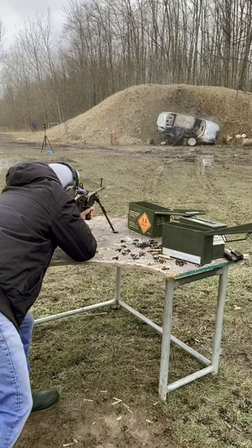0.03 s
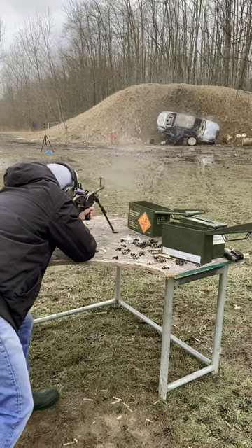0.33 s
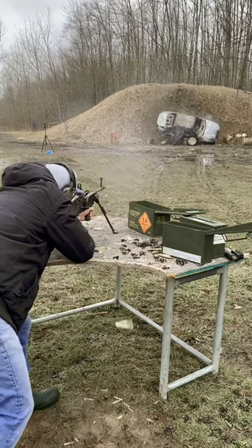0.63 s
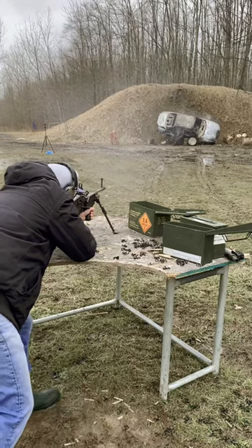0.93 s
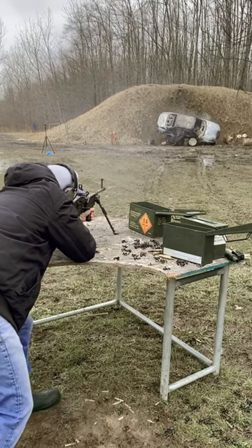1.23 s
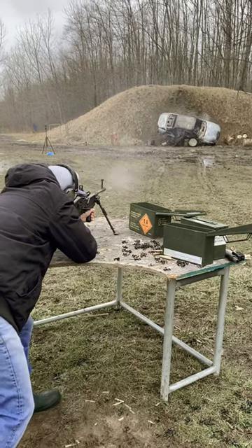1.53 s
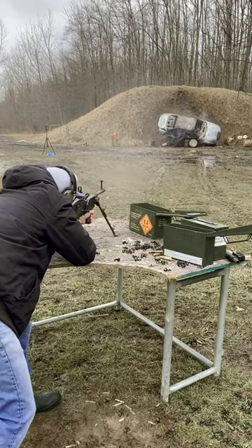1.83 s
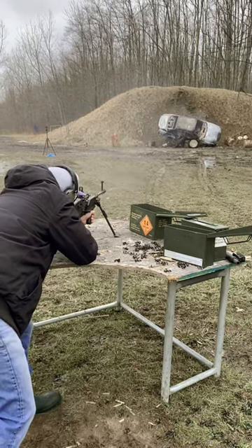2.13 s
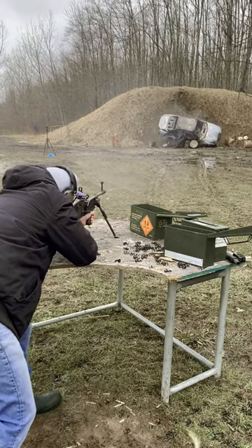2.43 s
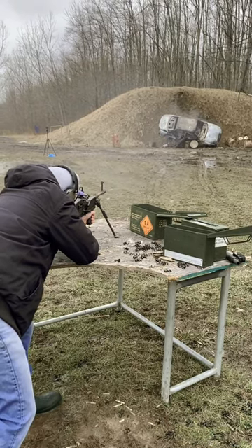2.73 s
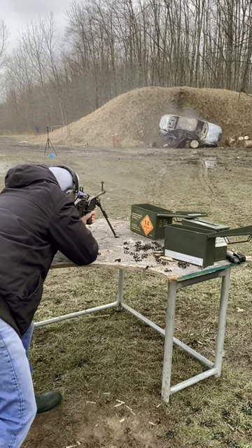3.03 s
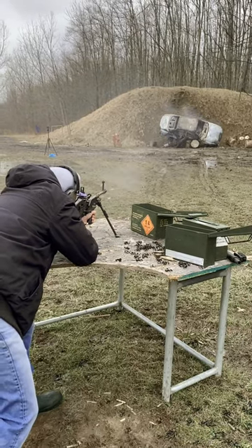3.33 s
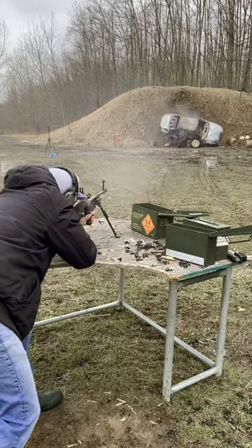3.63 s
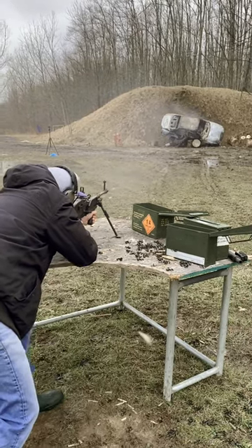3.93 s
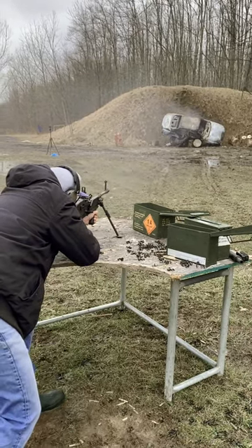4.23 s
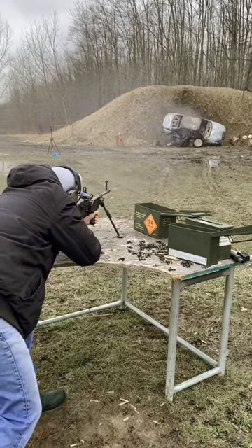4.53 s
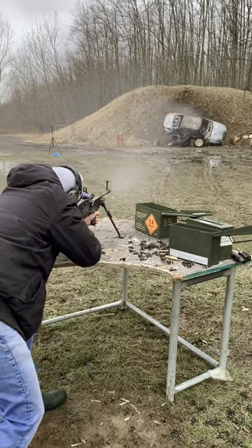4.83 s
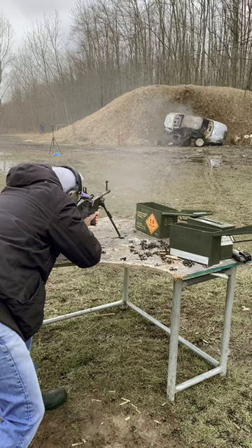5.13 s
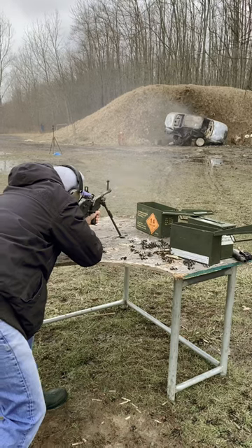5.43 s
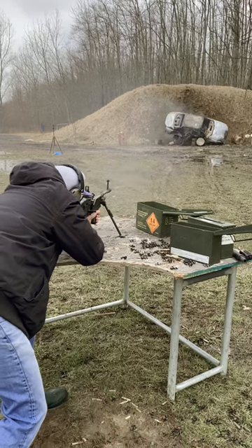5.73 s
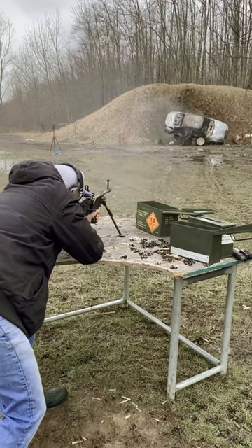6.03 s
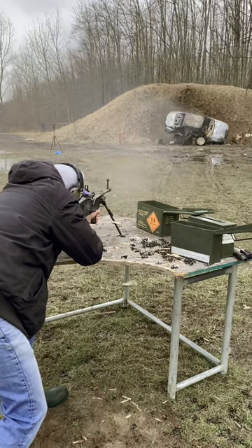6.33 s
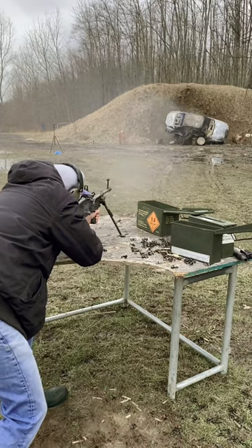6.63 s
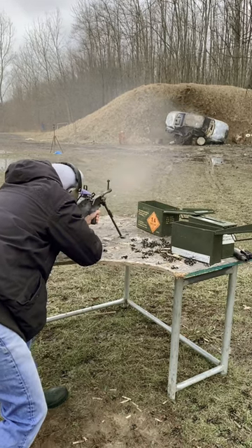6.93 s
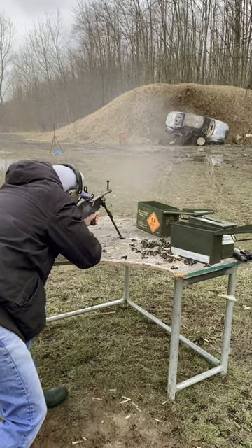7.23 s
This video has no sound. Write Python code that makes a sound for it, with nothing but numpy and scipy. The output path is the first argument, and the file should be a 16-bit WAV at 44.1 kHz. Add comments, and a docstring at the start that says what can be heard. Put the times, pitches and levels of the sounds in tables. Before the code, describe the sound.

Loud, close machine gun fire in six rapid bursts at an outdoor range, each followed by a long rolling echo.

```python
"""Machine gun on an outdoor range

A belt-fed gun fires six bursts from a table, a step from the microphone. Each muzzle blast is an
impulse that excites the modes of gun and table, with a thump of expanding gas behind it. Bolt, belt
links and spent brass ring on impact. Reflection from the berm and the forest edge draws the shots out
into a long, lumpy roll. A faint rumble opens the scene, and one deep boom underlies the first burst."""
import sys
import numpy as np
from scipy import signal
from scipy.fft import rfft, irfft, next_fast_len
from scipy.io import wavfile
from scipy.ndimage import uniform_filter1d

SR = 44100
rng = np.random.default_rng(int(sys.argv[2]) if len(sys.argv) > 2 else 0)


def output_pcm(signal):
    """Save a mono or channel-first signal as 16-bit PCM at the path in sys.argv[1].

    Samples are clipped to [-1, 1] before scaling.
    """
    pcm = np.clip(np.atleast_2d(signal).T, -1, 1) * 32767
    wavfile.write(sys.argv[1], SR, np.round(pcm).astype(np.int16))


N = 321930

# bursts of fire (first round t/s, last round t/s, number of rounds, lag of the last cycle t/s,
# ring level/dB, thump level/dB, echo level/dB, bolt catch level/dB)
BURSTS = [(0.2098, 0.5568, 4, .006, 2.5, 2, 8.5, -17), (1.5473, 1.7712, 3, 0.0035, -1, 0.5, 1, -28),
          (2.186, 2.299, 2, 0, -1.5, 0, -0.5, -24), (3.2819, 3.7287, 5, 0.0016, -2, -.5, 0, -14.5),
          (4.631, 5.196, 6, .0105, -1, 0, -1.5, -23.5), (6.1724, 7.2796, 11, 0, -2, -2.5, -2.5, -23)]
# spectral density of the low rumble (f/Hz, level/dB)
RUMBLE_SPECTRUM = [(20, -13), (40, -9), (60, 5), (90, 1), (140, -15.5), (300, -37.5), (1000, -48.5),
                   (5000, -41.5), (16000, -63.5)]
# spectral density of the open air (f/Hz, level/dB)
AIR_SPECTRUM = [(25, -28), (70, -10), (180, -2), (1500, -21.5), (5000, -36.5), (16000, -59.5)]
# modes of bolt and belt (f/Hz)
STEEL_HZ = [2660, 3770, 4520, 5400, 12400, 13500, 14600]
# spectral density of the swell before a blast (f/Hz, level/dB)
SWELL_SPECTRUM = [(100, -23.5), (300, -8), (550, 0), (950, -6), (1500, -11), (3000, -12.5),
                  (7000, -20.5), (16000, -44)]
# spectral density of the blast, also used for the bolt (f/Hz, level/dB)
BLAST_SPECTRUM = [(100, -8.5), (300, -1.5), (600, -3), (1100, -1), (1550, -6.5), (2500, -4), (3300, -7),
                  (5000, -8), (6500, -12.5), (10000, -12.5), (12500, -19), (16000, -19.5)]
# modes of gun, table and ammunition cans (f/Hz, level/dB, T60/s, left phase lead/rad)
BODY_MODES = [(162.4, -7.5, 0.064, 1.75), (233, -6.5, 0.059, 0.9), (329.7, 4.5, 0.045, 1.12),
              (497, -2, 0.059, 1.24), (640.5, 3, 0.041, 1.87), (777, -7.5, 0.084, 3.5),
              (914.5, -11, 0.13, 2), (992, -6, .055, 1.34), (1071, -6.5, 0.039, 1),
              (1287, -9.5, 0.085, 1.5), (1950, -15, 0.1, 0.75), (2295, -19.5, 0.049, 5),
              (2633, -6.5, 0.035, 1), (3060, -16, 0.041, 0.5), (3720, -12.5, 0.08, 1.8),
              (4500, -18.5, 0.11, 0.5)]
# spectral density of the reverberation from field and trees (f/Hz, level/dB)
ROLL_SPECTRUM = [(30, -16.5), (60, -5), (110, -6), (170, 1.5), (340, -5), (500, -5), (1000, -6.5),
                 (2500, -5.5), (5000, -9), (8000, -11), (12000, -37), (16000, -18.5)]
# reverberation time of field and trees (f/Hz, T60/s)
ROLL_T60 = [(50, 1), (100, 2.8), (180, 2.92), (500, 2.17), (1500, 2.02), (3000, 1.433), (6000, 0.77),
            (14000, 1.1)]
# ground, berm and forest edge (distance/m, depth/m, level/dB)
REFLECTORS = [(11.97, 7, -7.5), (28.79, 11, -2), (46.5, 10, -10.5)]
# landings of spent cases and links (t/s, level/dB)
BRASS_LANDINGS = [(2.676, -50.5), (4.247, -58.5), (5.49, -48), (5.667, -50), (5.803, -61), (5.84, -49),
                  (5.884, -61)]
# modes of a spent case (f/Hz, level/dB, T60/s)
BRASS_MODES = [(3300, -3.5, .015), (4680, -6, .02), (7300, -5, .02), (10360, 4, .025), (14280, -2, .09)]
# phase between the two microphone ports: near sounds, roll and rumble, boom (f/Hz, left lead/rad)
NEAR_PHASE = [(100, 4.5), (240, 0.45), (330, 1.5), (650, 1.92), (1500, 1.87), (6000, 1.8), (8000, 3.37),
              (11500, 4.75), (16000, 3.9)]
FAR_PHASE = [(100, 1.5), (400, 0.23), (1500, 0.16), (3200, 1.4), (6000, 2.14), (8000, 1.5), (11500, 14.5),
             (16000, 4)]
BOOM_PHASE = [(100, .2), (1000, 1)]
# coherence between the ports (f/Hz, coherence from 0 to 1)
COHERENCE = [(100, 0.99), (300, 0.88), (700, 0.96), (2500, 0.64), (6000, 0.13), (8000, 1), (11500, 1),
             (15000, 0.21)]
# response of the stereo widener to the mid signal (f/Hz, level/dB)
MID_RESPONSE = [(7000, 0.5), (8500, -7.5), (10000, -33), (11500, -14), (12500, -0.5)]

SOUND_M_PER_S = 343
BELT_START_S = .002   # the first cycle is slower: it has to set the belt moving
# a burst opens with a heavier, duller round, and the echo of its closing round stands out
FIRST_BLAST_DB, FIRST_RING_DB, FIRST_THUMP_DB = -1.0, 5.5, 5
FIRST_ECHO_DB, LAST_ECHO_DB = -2.5, 4


def from_db(db):
    """Amplitude ratio of a level in decibels."""
    return 10 ** (np.asarray(db) / 20)


def at_hz(points, hz):
    """Interpolation of a table on a logarithmic frequency axis."""
    f, value = np.transpose(points)
    return np.interp(np.log(np.maximum(hz, 1)), np.log(f), value)


def seconds(size):
    """Uniformly sampled time axis."""
    return np.arange(size) / SR


def fade(t, t60):
    """Exponential decay from t = 0, falling 60 dB in t60 seconds."""
    return (t >= 0) * np.exp(-np.log(1000) * np.maximum(t, 0) / t60)


def coloured(x, spectrum):
    """Spectral shaping of white noise at constant power."""
    gain = from_db(at_hz(spectrum, np.fft.rfftfreq(x.shape[-1], 1 / SR)))
    return irfft(rfft(x) * gain / np.sqrt(np.mean(gain ** 2)), x.shape[-1])


def ports(pair, phase):
    """Partial coherence: a common and a diffuse noise mix into left and right, shifted in phase."""
    hz = np.fft.rfftfreq(pair.shape[-1], 1 / SR)
    coherence = np.clip(at_hz(COHERENCE, hz), 0, 1)
    common = rfft(pair[0]) * np.sqrt((1 + coherence) / 2)
    diffuse = rfft(pair[1]) * np.sqrt((1 - coherence) / 2)
    turn = np.exp(.5j * at_hz(phase, hz))
    return irfft(np.array([(common + diffuse) * turn, (common - diffuse) / turn]), pair.shape[-1])


def add(out, s, sound):
    """Superposition of a sound on a track, starting at s seconds."""
    start = max(round(s * SR), 0)
    part = sound[..., :max(N - start, 0)]
    out[..., start:start + part.shape[-1]] += part


def place(times, sounds):
    """Superposition of stereo sounds, each at its own time."""
    out = np.zeros((2, N))
    for s, sound in zip(times, sounds):
        add(out, s, sound)
    return out


def rounds():
    """Nearly periodic firing: one row a round (t/s, then blast, ring, thump and echo level/dB)."""
    rows = []
    for start, end, shots, lag, ring_db, thump_db, echo_db, _ in BURSTS:
        k = np.arange(round(shots))
        first, last = k == 0, k == k[-1]
        steady = np.linspace(start + BELT_START_S, end - lag, len(k))
        rows.append(np.c_[steady - first * BELT_START_S + last * lag,
                          first * FIRST_BLAST_DB,
                          ring_db + first * FIRST_RING_DB,
                          thump_db + first * FIRST_THUMP_DB,
                          echo_db + first * FIRST_ECHO_DB + last * LAST_ECHO_DB])
    return np.vstack(rows)


def rumble(level_db=-60.0, start_s=.034, rise_s=0.0088, t60=4.0, air_db=-81.0):
    """Ambient noise: a faint low rumble decays exponentially over quiet, steady open air."""
    t = np.maximum(seconds(N) - start_s, 0)
    low, air = rng.standard_normal((2, 2, next_fast_len(N, True)))
    air = from_db(air_db) * coloured(air, AIR_SPECTRUM)[:, :N]
    low = from_db(level_db) * ports(coloured(low, RUMBLE_SPECTRUM), FAR_PHASE)[:, :N]
    return (1 - np.exp(-t / rise_s)) * (low * fade(t, t60) + air)


def bolt(release_s=0.06, release_db=-46.5, feed_s=0.024, feed_db=-36, catch_s=.115,
         rise_s=0.0034, slide_t60=0.18, catch_t60=0.059, low_hz=900.0, ring_db=-0.5, ring_q=28.0):
    """Impacts excite steel resonances: the bolt is freed, feeds a round and is caught after the burst."""
    t = seconds(4096)
    starts, ends, *_, catch_db = np.transpose(BURSTS)
    times = np.r_[starts - release_s, starts - feed_s, ends + catch_s]
    level_db = np.r_[np.repeat([release_db, feed_db], len(starts)), catch_db][:, None]
    t60 = np.repeat([slide_t60, slide_t60, catch_t60], len(starts))[:, None]
    envelope = from_db(level_db) * (1 - np.exp(-t / rise_s)) * fade(t, t60)
    noise = ports(coloured(rng.standard_normal((2, len(times), len(t))), BLAST_SPECTRUM), NEAR_PHASE)
    clacks = place(times, (noise * envelope).swapaxes(0, 1)) + 1e-18
    ring = sum(signal.lfilter(*signal.iirpeak(hz, ring_q, fs=SR), clacks) for hz in STEEL_HZ)
    highpass = signal.butter(2, low_hz, "high", fs=SR, output="sos")
    return signal.sosfilt(highpass, (clacks + from_db(ring_db) * ring) / 2)


def hollow_swell(level_db=-26.0, swell_s=0.036):
    """Exponential growth: a short swell of hollow noise runs up to each blast."""
    t = seconds(2048)
    times, _, ring_db, _, _ = rounds().T
    noise = ports(coloured(rng.standard_normal((2, len(times), len(t))), SWELL_SPECTRUM), NEAR_PHASE)
    swells = noise * fade(t[::-1], swell_s) * from_db(level_db + ring_db)[:, None]
    return place(times - t[-1], swells.swapaxes(0, 1))


def muzzle_blast(level_db=-11.0, repeat_share=.45, rise_s=0.00048, hold_s=0.004, t60=0.079,
                 scatter_db=-11.5, scatter_t60=0.22):
    """Scattering by nearby things breaks the blast into noise: part repeats, part is fresh turbulence."""
    t = seconds(8192)
    times, blast_db = rounds().T[:2]
    repeated = np.sqrt(repeat_share) * rng.standard_normal((2, 1, len(t)))
    turbulence = np.sqrt(1 - repeat_share) * rng.standard_normal((len(times), 2, len(t)))
    noise = ports(coloured(repeated + turbulence.swapaxes(0, 1), BLAST_SPECTRUM), NEAR_PHASE)
    held_s = hold_s * from_db(2 * blast_db)[:, None]   # a stronger blast lasts longer
    direct = fade(np.maximum(t - held_s, 0), t60)
    scattered = from_db(scatter_db) * fade(t, scatter_t60)
    envelope = (1 - np.exp(-t / rise_s)) * np.hypot(direct, scattered)
    blasts = noise * envelope * from_db(blast_db + level_db)[:, None]
    return place(times - .0005, blasts.swapaxes(0, 1))


def body_ring(level_db=-13.5, vary_db=1.0, detune=.011, build_cycles=1.0, crossover_hz=878.0,
              hold_s=0.004, scatter_rad=0.46, delay_s=0.001165):
    """Modal vibration: each round excites gun, table and cans a little differently."""
    t, out = seconds(6000), np.zeros((2, N))
    hz, mode_db, t60, lead = np.transpose(BODY_MODES)[:, :, None]
    start_phase = np.pi * np.arange(len(hz))[:, None] ** 2 / 4   # the modes start out of step
    build = 1 - np.exp(-(t * hz / build_cycles) ** 2)   # low modes take longer to build
    low = 1 / (1 + (hz / crossover_hz) ** 2)   # the push of gas drives low modes, the crack the steel
    for s, blast_db, ring_db, _, _ in rounds():
        strength, pitch, left, right = rng.standard_normal((4, len(hz), 1))
        gain = from_db(level_db + low * ring_db + (2 - low) * blast_db + mode_db + vary_db * strength)
        envelope = gain * build * fade(np.maximum(t - hold_s * from_db(ring_db), 0), t60)
        phase = start_phase + np.array([scatter_rad * left + lead / 2, scatter_rad * right - lead / 2])
        modes = envelope * np.sin(2 * np.pi * hz * (1 + detune * pitch) * t + phase)
        late_s = delay_s * from_db(4 * blast_db)   # after a long blast the ring comes later
        add(out, s + late_s, modes.sum(axis=1))
    return out


def gas_thump(level_db=-18.5, start_hz=120.0, end_hz=68.0, fall_s=0.011, detune=.17, t60=0.065,
              delay_s=0.007, bounce_s=.048, bounce_db=-10.0):
    """Damped pulsation: the gas ball swells and collapses, falling in pitch; the field echoes it once."""
    t, out = seconds(9000), np.zeros((2, N))
    cycles = end_hz * t + (start_hz - end_hz) * fall_s * (1 - np.exp(-t / fall_s))
    for s, _, _, thump_db, _ in rounds():
        pitch = 1 + detune * rng.standard_normal()
        wave = from_db(level_db + thump_db) * np.sin(2 * np.pi * cycles * pitch) * fade(t, t60)
        add(out, s + delay_s, wave)
        add(out, s + bounce_s, from_db(bounce_db) * wave)
    return out


def roll(level_db=-33.5, rise_s=0.034, grain_db=2.0, echo_weight=0.36,
         forest_s=0.21, forest_width_s=0.076, forest_db=1.0, forest_hz=297.4):
    """Reverberation: countless echoes off ground and trunks, with a dull swell from the forest edge."""
    t = seconds(98304)
    hz = np.fft.rfftfreq(len(t), 1 / SR)
    centres = np.geomspace(40, 16000, 14)
    impulses = np.zeros((2, N))
    for s, _, _, _, echo_db in rounds():
        # moving air changes the echo paths: each round excites its own blend of two responses
        angle = rng.uniform(0, np.pi)
        blend = np.array([np.cos(angle), np.sin(angle)])
        impulses[:, round(s * SR)] = from_db(level_db + echo_weight * echo_db) * blend
    knots = t[::256]
    grain = from_db(grain_db * np.interp(t, knots, rng.standard_normal(len(knots))))
    spectra = rfft(ports(coloured(rng.standard_normal((2, 2, len(t))), ROLL_SPECTRUM), FAR_PHASE))
    swell = from_db(forest_db) * np.exp(-((t - forest_s) / forest_width_s) ** 2)
    response = 0
    for centre, weights in zip(centres, np.eye(len(centres))):
        band = irfft(spectra * at_hz(np.c_[centres, weights], hz))
        forest = swell / (1 + np.log2(centre / forest_hz) ** 2)
        response += band * (1 - np.exp(-t / rise_s) + forest) * fade(t, at_hz(ROLL_T60, centre))
    return signal.fftconvolve(impulses[None], response * grain, axes=-1).sum(axis=1)[:, :N]


def belt_links(level_db=-40.5, t60=.045, settle_db_per_s=53.0, scatter_s=.12, vary_db=4.0,
               detune=0.023, count=7):
    """Free vibration: each round jerks the belt and loose links ring, softer the later they land."""
    t, out = seconds(4096), np.zeros((2, N))
    hz = np.array(STEEL_HZ)[:, None]
    for s in rounds()[:, 0]:
        for late_s in .02 + rng.exponential(scatter_s, count):
            strength, pitch, left, right = rng.standard_normal((4, len(hz), 1))
            gain = from_db(level_db - settle_db_per_s * late_s + vary_db * strength) * np.sqrt(hz[0] / hz)
            modes = np.sin(2 * np.pi * hz * (1 + detune * pitch) * t + np.array([left, right]))
            add(out, s + late_s, (gain * fade(t, t60) * modes).sum(axis=1))
    return out


def dull_echoes(level_db=-27.5, hz=292.0, detune=0.36, rise_cycles=0.52, lead_rad=0.24, count=6):
    """Reflection: large, distant surfaces return the blast as dull thuds, spread over their depth."""
    t, out = seconds(2048), np.zeros((2, N))
    phase = np.array([[lead_rad], [0]])
    for s, _, _, _, echo_db in rounds():
        for distance, depth, surface_db in REFLECTORS:
            gain = from_db(level_db + echo_db + surface_db)
            metres = distance + depth * ((np.arange(count) + rng.random(count)) / count - .5)
            for delay_s, pitch in zip(2 * metres / SOUND_M_PER_S, rng.standard_normal(count)):
                cycles = t * hz * np.exp(detune * pitch)
                envelope = cycles / rise_cycles * np.exp(1 - cycles / rise_cycles)
                add(out, s + delay_s, gain * envelope * np.sin(2 * np.pi * cycles + phase))
    return out


def sharp_echoes(level_db=-30.0, distance_m=30.0, depth_m=9.0, low_hz=700.0, high_hz=2600.0, count=10):
    """Backscatter: hard objects around the berm return each blast as a spray of small clicks."""
    clicks = np.zeros((2, N))
    for s in rounds()[:, 0]:
        for metres in distance_m + depth_m * (rng.random(count) - .5):
            add(clicks, s + 2 * metres / SOUND_M_PER_S, rng.standard_normal((2, 1)))
    bandpass = signal.butter(2, [low_hz, high_hz], "band", fs=SR, output="sos")
    band_share = 2 * (high_hz - low_hz) / SR
    return from_db(level_db) / band_share * signal.sosfilt(bandpass, clicks + 1e-18)


def boom(start_s=.378, level_db=-13.5, hz=56.0, rise_s=.007, t60=.2, tail_db=-11.0, tail_t60=1.1):
    """Damped oscillation: one deep boom swells under the first burst and rumbles away as noise."""
    t = seconds(65536)
    tail = ports(coloured(rng.standard_normal((2, len(t))), RUMBLE_SPECTRUM), BOOM_PHASE)
    wave = np.sin(2 * np.pi * hz * t) * fade(t, t60) + from_db(tail_db) * tail * fade(t, tail_t60)
    return place([start_s], [from_db(level_db) * (1 - np.exp(-t / rise_s)) * wave])


def spent_brass(detune=0.02, tick_db=-1.5, tick_t60=.012):
    """Impact excitation: each case lands with a dry tick and rings briefly at its own frequencies."""
    t, out = seconds(8192), np.zeros((2, N))
    hz, mode_db, t60 = np.transpose(BRASS_MODES)[:, :, None]
    phase = at_hz(NEAR_PHASE, hz) / 2 * np.array([1, -1])[:, None, None]
    for s, level_db in BRASS_LANDINGS:
        case_hz = hz * (1 + detune * rng.standard_normal(hz.shape))
        ring = (from_db(mode_db) * fade(t, t60) * np.sin(2 * np.pi * case_hz * t + phase)).sum(axis=1)
        tick = from_db(tick_db) * fade(t, tick_t60) * rng.standard_normal((2, len(t)))
        add(out, s, from_db(level_db) * (ring + tick))
    return out


def gain_control(x, open_db=29.0, ceiling_db=-9.0):
    """Compression without release: the gain starts high, and the first blast pushes it down for good."""
    power = uniform_filter1d(np.mean(x ** 2, axis=0), size=128)
    loudest = np.sqrt(np.maximum.accumulate(np.maximum(power, 1e-18)))
    return x * np.clip(from_db(ceiling_db) / loudest, 1, from_db(open_db))


def scene():
    """Superposition of the gun close by and the range around it."""
    gun = hollow_swell() + muzzle_blast() + body_ring() + gas_thump() + bolt()
    clatter = belt_links() + spent_brass()
    reflections = dull_echoes() + sharp_echoes() + roll()
    return gun + clatter + reflections + boom() + rumble()


def record(dry, saturation=0.83, clip=0.66, low_hz=37.4, high_hz=16000):
    """Nonlinear, band-limited chain: gain control, soft overload, treble widening and peak clipping."""
    highpass = signal.butter(3, low_hz, "high", fs=SR, output="sos")
    lowpass = signal.ellip(10, .1, 80, high_hz, fs=SR, output="sos")
    left, right = saturation * np.tanh(signal.sosfilt(highpass, gain_control(dry)) / saturation)
    size = next_fast_len(N + SR, True)
    mid_gain = from_db(at_hz(MID_RESPONSE, np.fft.rfftfreq(size, 1 / SR)))
    mid = irfft(rfft(left + right, size) * mid_gain, size)[:N]   # a notch in the mid widens that band
    side = left - right
    wide = np.array([mid + side, mid - side]) / 2
    return signal.sosfilt(lowpass, np.clip(wide, -clip, clip))


dry = scene()
out = record(dry)
output_pcm(out)
```